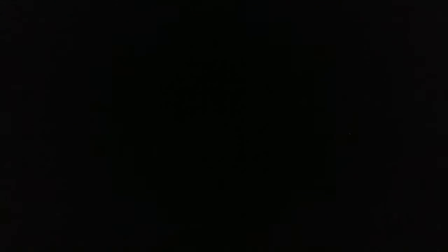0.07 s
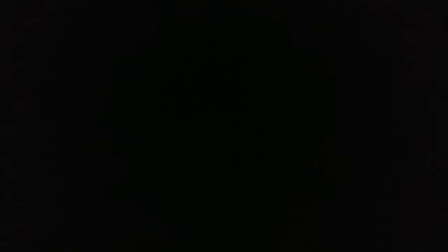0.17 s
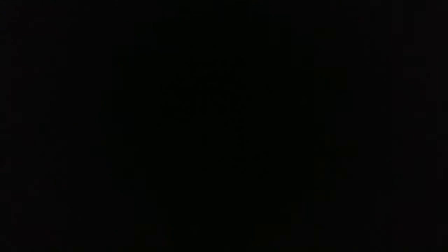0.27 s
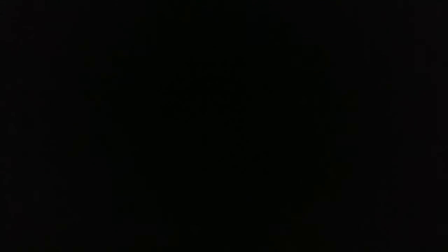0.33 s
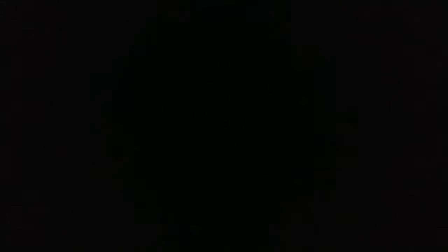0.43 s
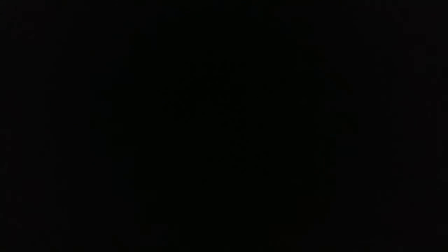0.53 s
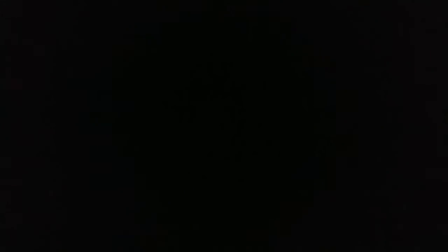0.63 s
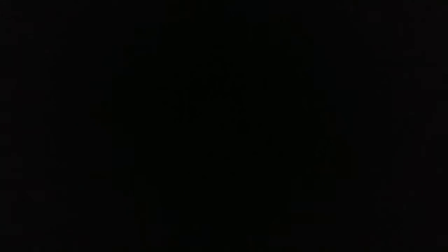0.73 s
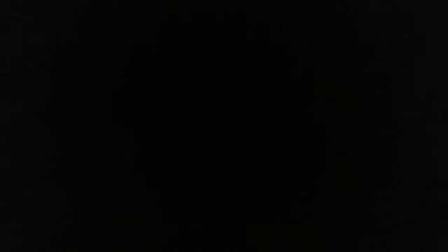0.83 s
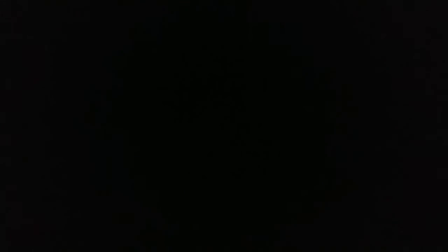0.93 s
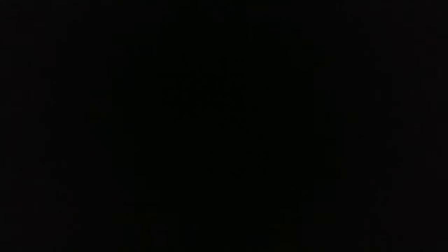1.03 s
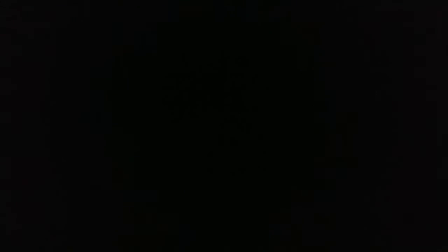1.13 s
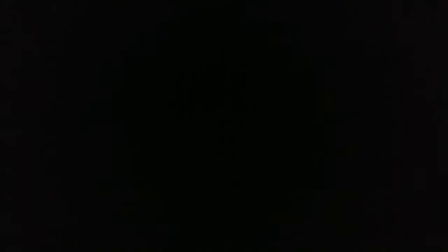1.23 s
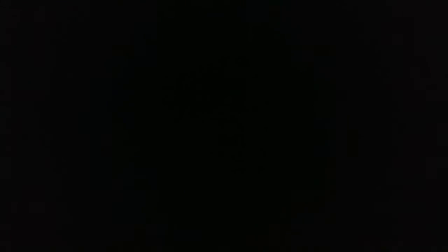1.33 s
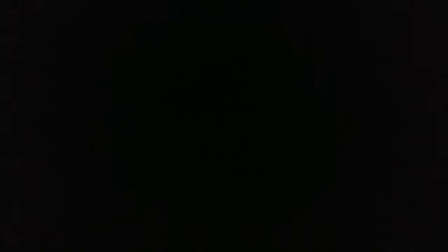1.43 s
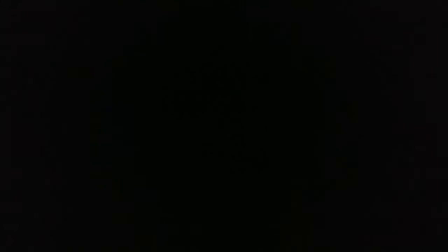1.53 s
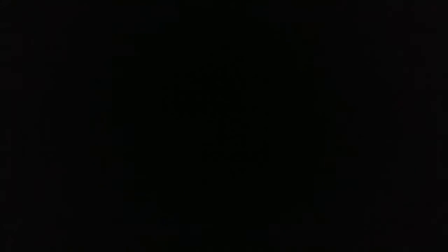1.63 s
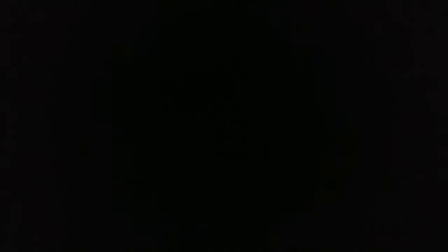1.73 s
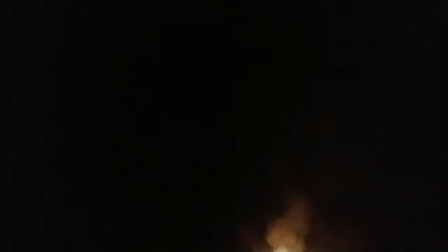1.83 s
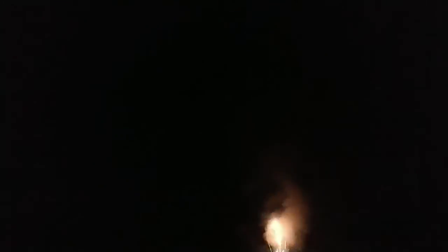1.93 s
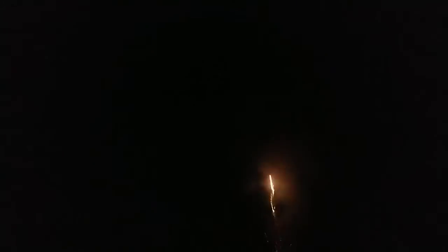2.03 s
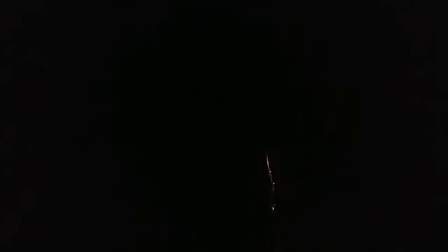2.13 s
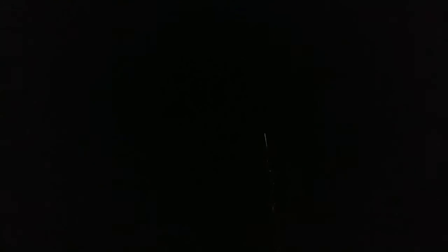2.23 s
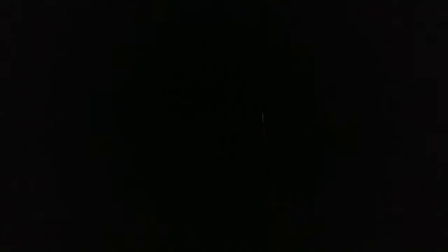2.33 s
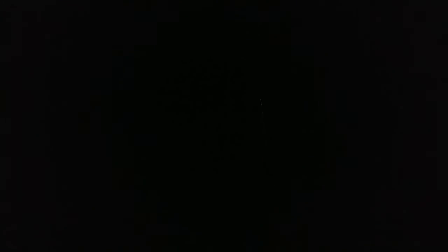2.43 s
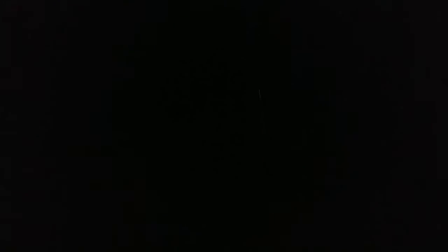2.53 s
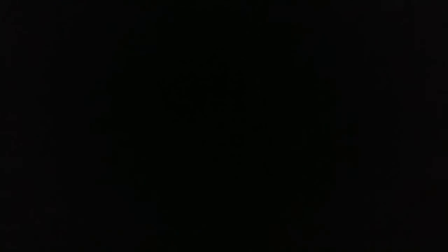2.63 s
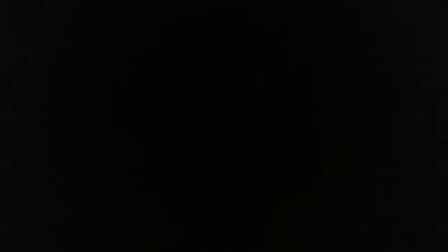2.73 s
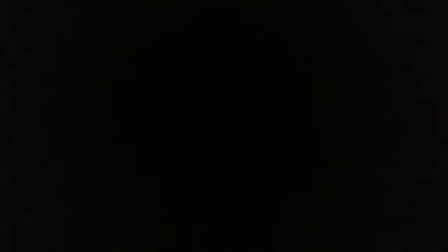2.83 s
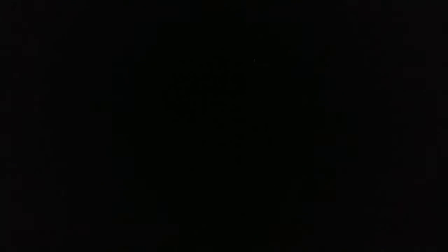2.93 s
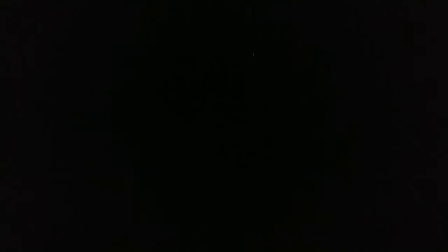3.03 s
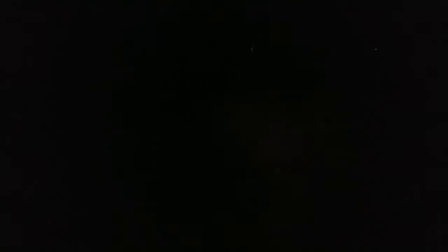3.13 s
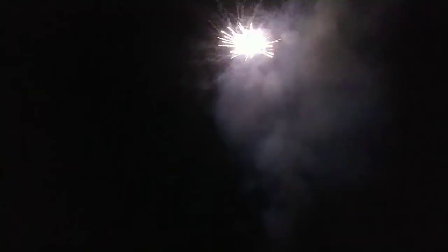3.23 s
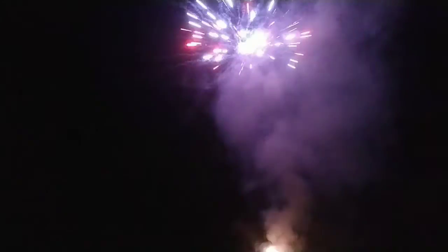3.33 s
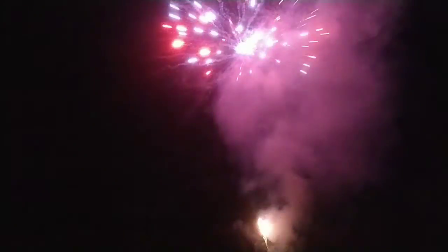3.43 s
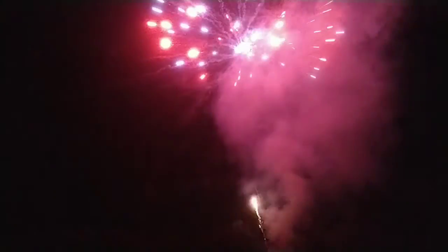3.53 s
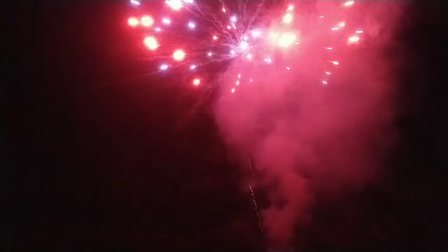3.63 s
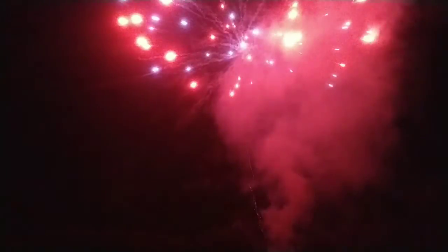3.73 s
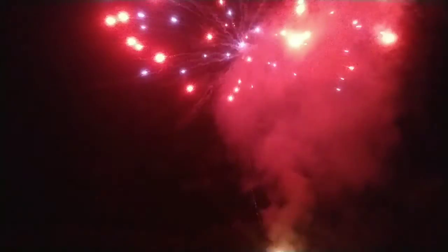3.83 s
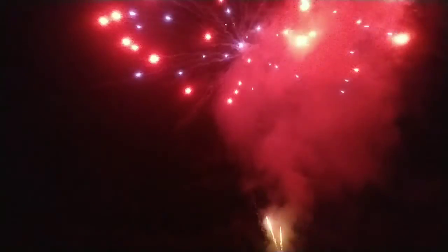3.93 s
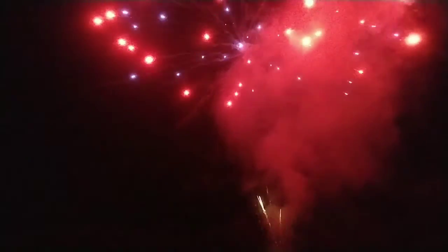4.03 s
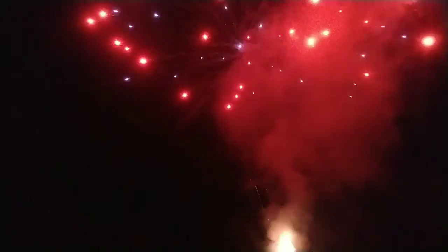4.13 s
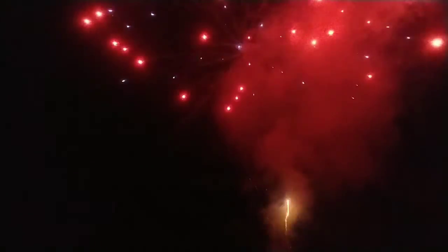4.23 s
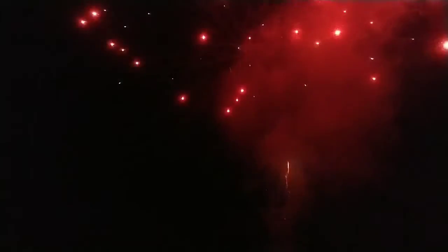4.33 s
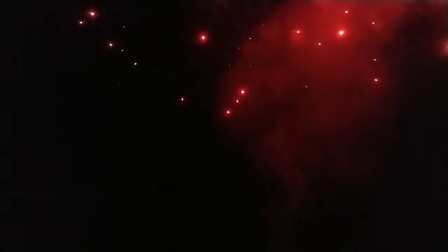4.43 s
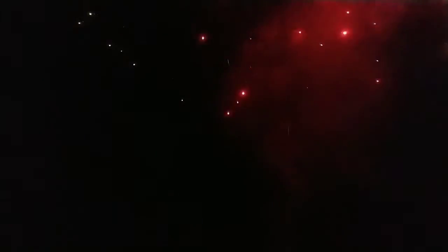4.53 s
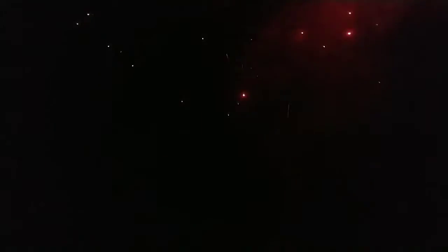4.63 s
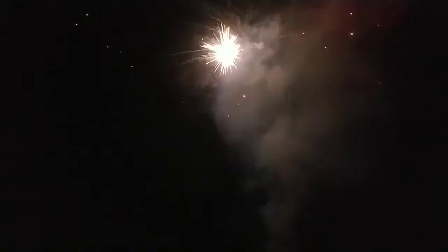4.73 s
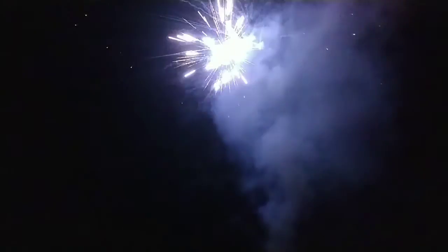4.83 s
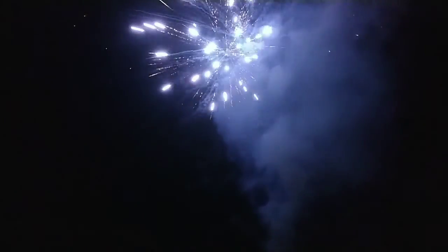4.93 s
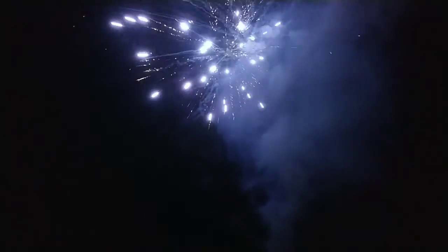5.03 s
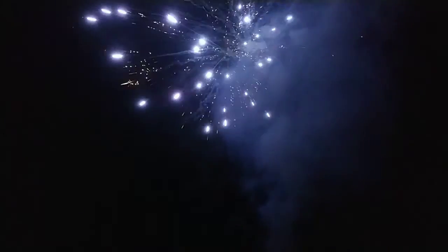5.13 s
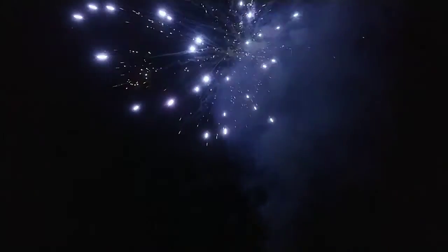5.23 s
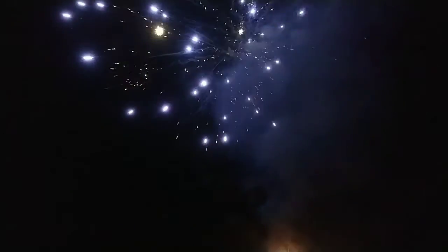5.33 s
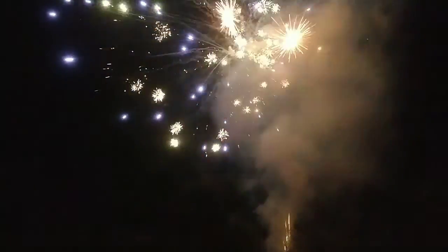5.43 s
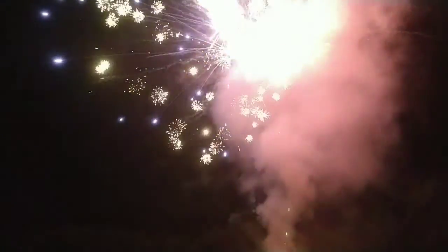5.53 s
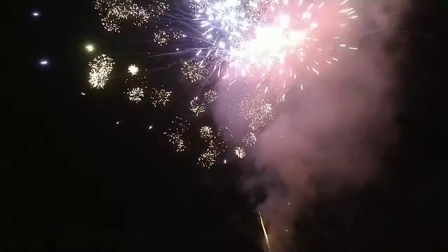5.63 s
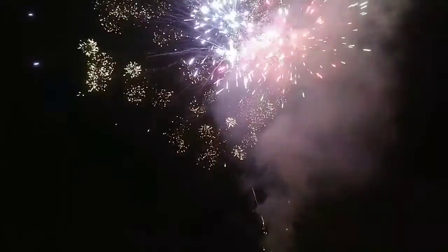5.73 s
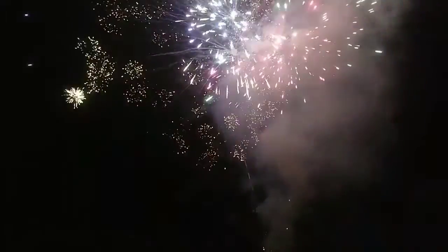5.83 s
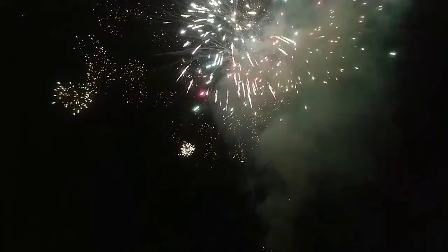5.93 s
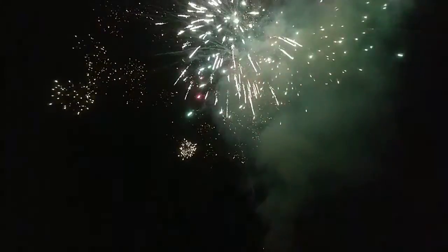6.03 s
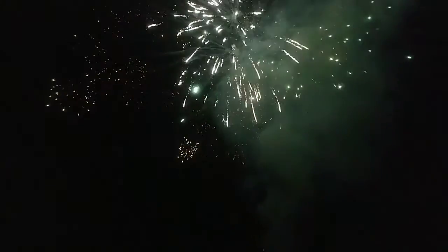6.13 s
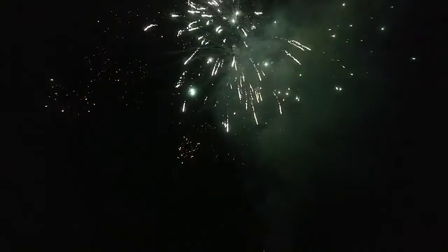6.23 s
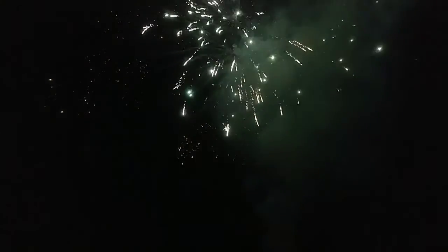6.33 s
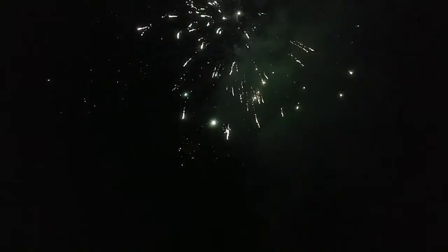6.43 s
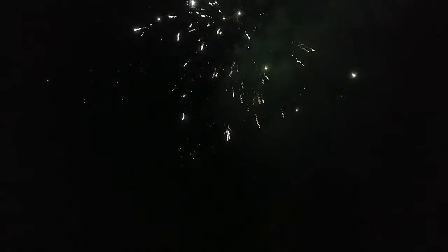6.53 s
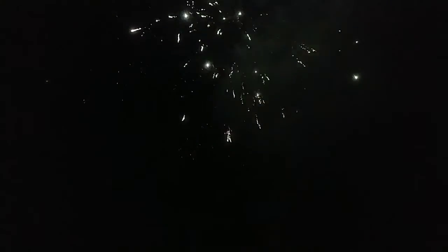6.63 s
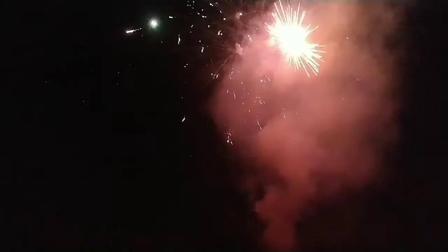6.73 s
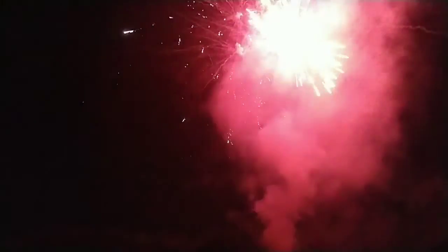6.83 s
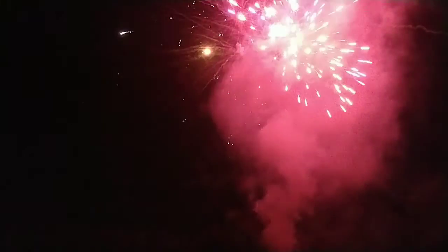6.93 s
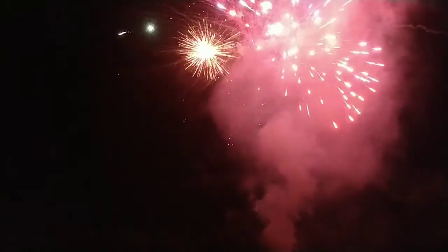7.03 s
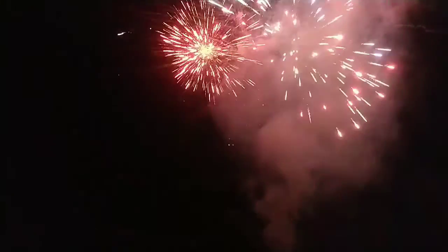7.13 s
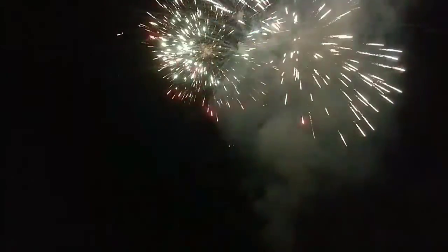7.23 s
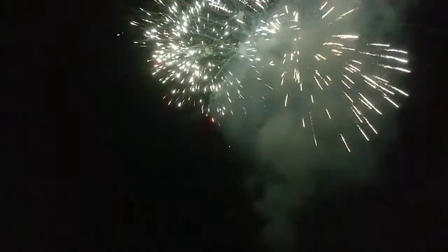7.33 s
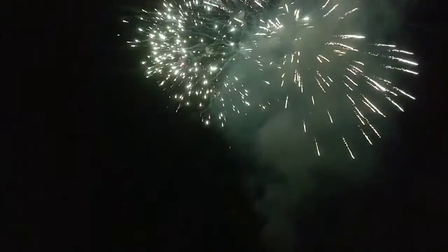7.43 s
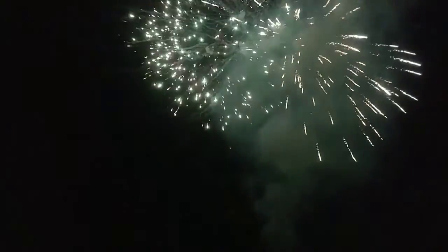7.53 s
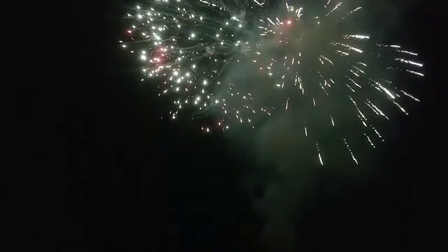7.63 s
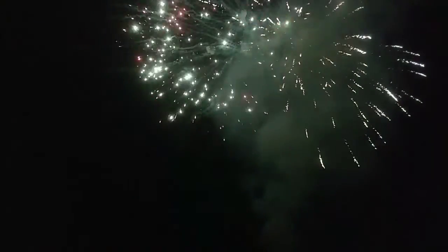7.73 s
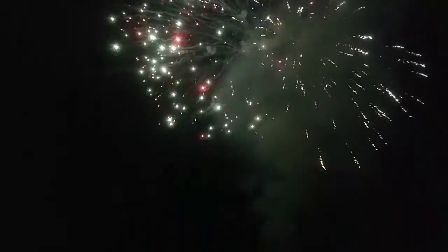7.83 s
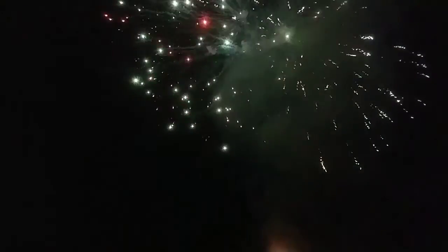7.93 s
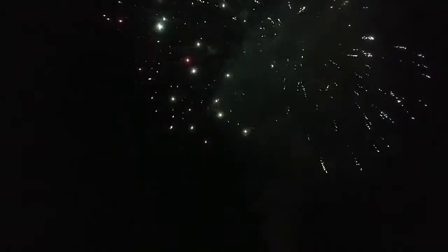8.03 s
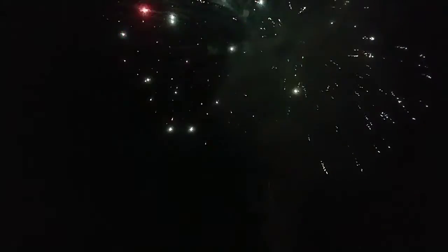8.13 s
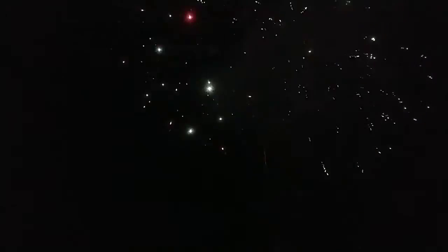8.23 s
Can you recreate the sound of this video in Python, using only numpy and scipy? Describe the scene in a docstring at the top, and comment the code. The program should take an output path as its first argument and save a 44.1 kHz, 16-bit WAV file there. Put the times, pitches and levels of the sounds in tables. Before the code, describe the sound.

A night-time fireworks show over open ground, heard close by. Low distant rumble and two faint far thuds come first, then a spitting launch thump with long echoes. After a small lone pop, shells burst overhead with hard cracks and booms, interleaved with more launch thuds. A swarm of stars crackles around six seconds, then two more bursts and a late launch. A small stereo microphone slightly flattens the loudest peaks.

```python
"""Fireworks at night over open ground. First a quiet distant rumble with a faint whine and two far thuds. From
2 s lift charges spit gas and thump out of the mortar tubes, and walls and trees roll each report back. A lone
star pops, then from 3.5 s shells crack overhead and again off the ground, as decaying shocks and booms. Near 6
s a swarm of stars crackles in short shocks. A small two-port microphone hears it all, and the loudest peaks are
rounded off."""
import sys
import numpy as np
from scipy import signal
from scipy.fft import rfft, irfft, next_fast_len
from scipy.io import wavfile
from scipy.ndimage import uniform_filter1d

SR = 44100
rng = np.random.default_rng(int(sys.argv[2]) if len(sys.argv) > 2 else 0)


def wav_out(sig):
    """Save sig, one row per channel (or a flat mono array), as 16-bit PCM at SR to the path in sys.argv[1]."""
    wavfile.write(sys.argv[1], SR, np.round(np.clip(np.atleast_2d(sig).T, -1, 1) * 32767).astype(np.int16))


N = 365148
HZ = np.fft.rfftfreq(N, 1 / SR)
TIME = np.arange(N) / SR

# lift charges leaving the tubes: (time [s], thump level [dB], gas over thump [dB], thump pitch [Hz],
# roll level [dB], roll tilt [dB per band upwards])
LIFT_CHARGES = [(2.048, -7.5, -8.5, 173, 1, 0), (3.5219, -14.5, -11, 175, -5.5, 0.5),
                (4.043, -10.5, -9.5, 194, 1.5, -0.5), (4.2837, -8, -8, 182, 1, 0),
                (5.5142, -7.5, -10.5, 167.4, 1.5, -0.5), (5.7549, -15, -11.5, 179, -7.5, 1),
                (8.1197, -7, -6.5, 171, 1, 0)]
# shells bursting overhead: (time [s], boom level [dB], crack over boom [dB], ground bounce delay [s],
# roll level [dB], roll tilt [dB per band upwards])
SHELL_BURSTS = [(3.4839, -5.5, -20, 0.006, 1.5, -0.5), (5.002, -5.5, -20, 0.0056, 0, 0),
                (5.7057, -6, -19, .0055, 2.5, -2.2), (5.7261, -11.5, -23, 0.0051, -1.5, 1.33),
                (6.9711, -6, -21, 0.00535, -1, 0.5), (7.2959, -7, -21, 0.0056, -1.5, 0)]
# far walls returning a lift: (delay [s], level [dB])
LIFT_WALLS = [(.115, -8), (.19, -7.5), (0.31, -8), (0.398, -10.5), (0.471, -8.5), (.514, -6.5),
              (.615, -16.5), (.645, -15.5), (0.729, -22.5), (.838, -17), (.868, -46), (1.033, -29),
              (1.063, -27.5), (1.176, -31.5)]


def undb(db):
    """Decibels to an amplitude factor."""
    return 10 ** (np.asarray(db) / 20)


def unit(x):
    """Scale to an RMS of one."""
    return x / np.sqrt(np.mean(x ** 2))


def along(table, order=1, hz=HZ):
    """A column of a (Hz, ..) table at every frequency, interpolated over log frequency."""
    table = np.array(table)
    return np.interp(np.log(hz + 1), np.log(table[:, 0]), table[:, order])


def band(x, lo_hz, hi_hz):
    """Keep the sound between two frequencies."""
    sos = signal.butter(2, [lo_hz, hi_hz], "bandpass", fs=SR, output="sos")
    return signal.sosfilt(sos, x)


def walk(rate):
    """Random levels held 1 / rate s and slewed twice."""
    hold = int(SR / rate)
    steps = np.repeat(rng.standard_normal(N // hold + 1), hold)
    return uniform_filter1d(uniform_filter1d(steps, hold), hold)[:N]


def add(track, s, sound):
    """Lay a sound into the track from time s, cut at the end of the track."""
    i = int(s * SR)
    track[i:i + len(sound)] += sound[:max(N - i, 0)]


def thump(hz, cycles, rise_s=0.0001):
    """A pressure step rings the bass resonance of the microphone, swinging negative first."""
    t = TIME[:3000]
    ring = np.sin(2 * np.pi * hz * t) * np.exp(-t * hz / cycles)
    return -1.5 * ring * (1 - np.exp(-(t / rise_s) ** 2))


def night():
    """Distant rumble that drifts, sinks and swells again, a faint steady whine, two far thuds."""
    # slow course of the rumble: (time [s], level [dB])
    fade = [(0, -49.5), (.5, -52), (1.4, -54), (2, -54), (3.2, -57), (8.28, -51.5)]
    # spectrum of the rumble: (frequency [Hz], density [dB per Hz])
    colour = [(30, -19.5), (60, -9), (130, 2), (260, 2.5), (500, -4), (1000, -15), (1600, -26),
              (2200, -31.5), (2800, -34), (4500, -40), (6500, -35), (10000, -42.5), (16000, -46.5)]
    # faint far-off thuds: (time [s], level [dB], pitch [Hz])
    thuds = [(0.885, -39, 300), (1.318, -32.5, 310)]
    whine_hz, whine_width_hz, whine_db = 2730, 160, -82.5
    drift = undb(np.interp(TIME, *np.transpose(fade)) + 0.76 * walk(1.9) + 1.4 * walk(12))
    sides = []
    for _ in range(2):
        rumble = irfft(rfft(rng.standard_normal(N)) * undb(along(colour)), N)
        sides.append(drift * unit(rumble))
    narrow = np.exp(-((HZ - whine_hz) / whine_width_hz) ** 2)
    whine = irfft(rfft(rng.standard_normal(N)) * narrow, N)
    sides[0] += undb(whine_db) * unit(whine)
    for s, db, hz in thuds:
        add(sides[0], s, undb(db) * thump(hz, cycles=1.2, rise_s=.002))
    return sides


def ports(left, other, lag_s):
    """The right port hears less bass, ahead in phase, and the whole wave a little later."""
    # right port against left: (frequency [Hz], quieter by [dB], phase lead [rad],
    # likeness in diffuse sound [0-1])
    between_ports = [(30, 16, 1.75, 1), (169, 7.5, 2.06, 1), (530, 4, 2.36, 0.48), (860, 2.5, 2.46, 0.83),
                     (1440, 2.5, 2.6, 0.75), (2070, 1.5, 2.35, 0.65), (2500, 2.5, 2.38, 0.55),
                     (4100, 3, 1.6, 0.3), (5500, 5.5, .5, 0.2), (8200, 7.5, .1, 0.7),
                     (11300, -1.5, 0.26, 0.7), (16000, 0.5, .1, .8)]
    size = next_fast_len(N + SR)
    hz = np.fft.rfftfreq(size, 1 / SR)
    quieter_db, lead, like = (along(between_ports, order=k, hz=hz) for k in (1, 2, 3))
    like = np.clip(like, 0, 1)
    heard = rfft(left, size)
    if other is not None:  # diffuse sound is only partly alike at the two ports
        heard = like * heard + np.sqrt(1 - like ** 2) * rfft(other, size)
    turn = np.exp(1j * (lead - 2 * np.pi * hz * lag_s))
    right = irfft(heard * turn * undb(-quieter_db), size)[:N]
    return np.array([left, right])


def lifts():
    """Gas spits from the tube, the charge thumps, and near and far surfaces repeat it."""
    # near returns, the direct sound first: (delay [s], thump level [dB], gas level [dB], pitch factor)
    near = [(0, 8, 19.5, 1), (.009, -9.5, 7.5, 1.4), (0.0169, -7.5, 4.5, 1.4), (0.0277, 6, 5, 1.45),
            (.037, -8, 7.5, 1.4)]
    # a hard surface slaps back the middle of each lift: (delay [s], level [dB])
    slaps = [(.038, -7), (.076, -14)]
    slap_hz, slap_width_hz, slap_s = 1596, 880, .003
    lead_hiss_db, lead_hiss_s = -23, 0.0092  # a faint hiss just ahead of the spit
    bright_hz, bright_width_hz, bright_db = 6160, 1500, 6.5  # the brightest part of the gas
    out, t = np.zeros(N), TIME[:900]
    spit = (t / 0.0065) ** 2.63 * np.exp(-(t / 0.0048) ** 2.05)
    lead_hiss = np.minimum(t / .002, 1) * np.exp(-(t / lead_hiss_s) ** 4)
    slap = np.exp(-((t - 2 * slap_s) / slap_s) ** 2)

    def noise(lo_hz, hi_hz):
        """Random noise in one band."""
        return band(rng.standard_normal(len(t)), lo_hz, hi_hz)

    def noise_around(hz, width_hz):
        """Random noise centred on one frequency."""
        return noise(hz - width_hz / 2, hz + width_hz / 2)

    for s, db, gas_db, hz, *_ in LIFT_CHARGES:
        add(out, s - lead_hiss_s, undb(db + lead_hiss_db) * lead_hiss * noise(400, 8000))
        for delay, thump_db, spit_db, pitch in near:
            gas = noise(1100, 7800) + undb(bright_db) * noise_around(bright_hz, bright_width_hz)
            add(out, s + delay - .003, undb(db + gas_db + spit_db) * gas * spit)
            body = thump(hz * pitch, cycles=0.98, rise_s=.0004)
            add(out, s + delay + .0032, undb(db + thump_db) * body)
        for delay, slap_db in slaps:
            middle = unit(noise_around(slap_hz, slap_width_hz))
            add(out, s + delay - 2 * slap_s, undb(db + slap_db) * slap * middle)
        for delay, far_db in LIFT_WALLS:
            dull = thump(hz * 0.806, cycles=1.16, rise_s=0.0059)
            add(out, s + delay, undb(db + far_db) * dull)
    return out


def roll(density=900, scatter_db=0.5, clump_db=1.5):
    """Many scattered returns of uneven size come in clumps over a wash, shaped band by band."""
    # spectrum of the roll: (frequency [Hz], density [dB per Hz])
    colour = [(30, -29.5), (60, -12), (110, 1.5), (170, 3), (280, -4.5), (450, -10), (800, -12),
              (1300, -15.5), (1700, -18.5), (2400, -25.5), (3300, -26.5), (4700, -32.5), (6500, -27.5),
              (9500, -38), (11000, -40), (13500, -52.5), (16000, -67)]
    shared = walk(90)
    clumps = [clump_db * (share * shared + 0.46 * walk(60)) for share in (.2, 0.3, 0.61, 0.61, 0.51)]
    # five bands, bass to top, split at these edges in Hz
    below = [1 / (1 + (HZ / edge) ** 6) for edge in (210, 450, 2100, 9300)]
    shares = (below[0], below[1] - below[0], below[2] - below[1], below[3] - below[2], 1 - below[3])
    levels, sides = roll_levels(), []
    for _ in range(2):
        arrivals = rng.random(N) < density / SR  # density is returns per second
        sizes = undb(scatter_db * rng.exponential(size=N))
        returns = arrivals * sizes * rng.standard_normal(N)
        wash = rfft(.5 * unit(returns) + rng.standard_normal(N)) * undb(along(colour))
        parts = [unit(irfft(wash * share, N)) for share in shares]
        sides.append(sum(p * level * undb(c) for p, level, c in zip(parts, levels, clumps)))
    return sides


def roll_levels():
    """Amplitude of the five bands: all rolls add up, each dipping under the reports that follow it."""
    # roll after a report, one row per band (bass, low middle, middle, treble, top):
    # (near returns [dB], they last [s], their fall [dB/s], far swell [dB], swell arrives [s],
    # swell holds until [s], its fall [dB/s], smear of wall echoes [dB])
    lift_bands = [(-19.5, .04, 501, -28, 0.065, 0.35, 45.5, -17.5),
                  (-19, 0.053, 349, -25, 0.051, 0.19, 77, -43.5),
                  (-29.5, 0.039, 401, -30, 0.094, 0.23, 53, -36),
                  (-24.5, 0.036, 402, -29.5, 0.068, 0.19, 68.5, -44.5),
                  (-38.5, 0.04, 396, -45, 0.039, 0.12, 93, -69)]
    burst_bands = [(-20.5, 0.028, 400, -28.5, .1, 0.54, 23.6, -19.5),
                   (-15.5, 0.033, 680, -22.5, 0.033, 0.13, 24.6, -21),
                   (-23, 0.034, 420, -29.5, 0.11, 0.2, 19, -25.5),
                   (-32, 0.014, 300, -32, 0.12, 0.15, 29.7, -31),
                   (-47, .02, 300, -48.5, 0.065, 0.15, 47, -60)]  # same columns
    # far walls returning a burst: (delay [s], level [dB])
    burst_walls = [(.16, -5.5), (.58, -28), (.67, -11), (.98, -7.5), (1.039, -15)]
    duck_db, duck_s = -5.5, 0.24  # older rolls dip under each new report and come back
    roll_lag_s = 0.0048
    t = TIME[::44]  # a coarse grid is enough for slow levels
    reports = [(row[0], lift_bands, LIFT_WALLS, *row[-2:]) for row in LIFT_CHARGES]
    reports += [(row[0], burst_bands, burst_walls, *row[-2:]) for row in SHELL_BURSTS]
    power = 0
    for s, *shape in reports:
        dip_db = sum(duck_db * np.exp(-np.maximum(t - later, 0) / duck_s) * (t > later)
                     for later, *_ in reports if later > s)
        after = t - s - roll_lag_s
        power = power + roll_power(*shape, np.maximum(after, -1)) * undb(2 * dip_db)
    return [np.interp(TIME, t, np.sqrt(p)) for p in power]


def roll_power(bands, walls, level_db, tilt_db, t):
    """Power per band after one report: near returns, a swell from afar that dies away, smeared wall echoes."""
    gather_db, gather_s = -1.5, 0.031  # the first returns gather just behind the report
    smear_s, peak_s = .012, .007
    air_db_per_s = 5  # wall echoes lose this much more in each higher band
    rows = []
    # decibels are doubled because undb gives amplitude and these are powers
    for k, (near_db, near_s, near_fall, far_db, arrive_s, hold_s, far_fall, smear_db) in enumerate(bands):
        near_fade_db = near_fall * np.maximum(t - near_s, 0)
        near = undb(2 * (near_db - near_fade_db + gather_db * np.exp(-t / gather_s)))
        arrival = (1 - np.exp(-(t / arrive_s) ** 2)) ** 2
        swell = arrival * undb(2 * (far_db - far_fall * np.maximum(t - hold_s, 0)))
        echoes = 0
        for delay, db in walls:
            smear = np.exp(-((t - delay - peak_s) / smear_s) ** 2)
            echoes = echoes + undb(2 * (db - k * air_db_per_s * delay)) * smear
        total = near + swell + undb(2 * smear_db) * echoes
        rows.append(total * undb(2 * (level_db + k * tilt_db)))
    return np.array(rows) * (t >= 0)


def shock(hz, cycles):
    """A sudden jump up, a swing below, and quickly over."""
    t = TIME[:400]
    return np.cos(2 * np.pi * hz * t) * np.exp(-t * hz / cycles)


def stars():
    """Short shocks with a faint ground bounce: single ones, and a swarm of small ones."""
    # single crackling stars: (time [s], level [dB])
    singles = [(2.772, -32.5), (5.947, -13), (6.0012, -14), (6.007, -4), (6.0363, -8), (6.041, -5),
               (6.0482, -11), (6.2073, 0.5)]
    # swarm of small stars: (time [s], level [dB])
    swarm = [(5.55, -42), (5.85, -23.5), (6.05, -14.5), (6.3, -22), (6.6, -65)]
    swarm_per_s, swarm_scatter_db = 290, 2.5
    out = np.zeros(N)
    pop = band(shock(2200, cycles=0.13), 600, 8600)
    for s, db in singles:
        add(out, s, undb(db) * pop)
    s, db = np.transpose(swarm)
    swarm_level = undb(np.interp(TIME, s, db, left=-200, right=-200))
    sizes = (rng.random(N) < swarm_per_s / SR) * undb(swarm_scatter_db * rng.standard_normal(N))
    dull = band(shock(740, cycles=0.37), 300, 7200)
    out += signal.fftconvolve(sizes * swarm_level, dull)[:N]
    lag = int(.005 * SR)  # the ground bounce comes 5 ms behind
    return out + undb(-12.5) * np.concatenate([np.zeros(lag), out[:-lag]])


def bursts():
    """A shock and its boom: direct, off things close by, off a near wall, and rounded off the ground."""
    # arrivals besides the ground: (delay [s], shock level [dB], boom level [dB], crack level [dB],
    # roundness [0-1])
    paths = [(0.0, 8.5, 5, 20, 0.65), (.0020, 2, -38, 10, 1), (.0032, 4.5, -7, 3, .75),
             (0.0231, 0, -9, -8, 0.9), (0.0297, 7, -9, -8, 0.9)]
    # the ground bounce: (shock level [dB], boom level [dB], crack level [dB], roundness [0-1])
    ground = (12, 1.2, 3, 0.79)
    boom_hz, boom_cycles, low_hz = 220, .85, 100
    out, t = np.zeros(N), TIME[:3000]
    front = shock(645, cycles=0.39)
    for s, db, crack_db, bounce, *_ in SHELL_BURSTS:
        for delay, shock_db, boom_db, edge_db, soft in paths + [(bounce, *ground)]:
            # the front is ragged in the treble; each path rounds it by its own amount
            crack = rng.standard_normal(len(t)) * np.exp(-t / 0.0013)
            keep = min(soft, .95)
            rounded = signal.lfilter([(1 - keep) ** 2], [1, -2 * keep, keep ** 2], front)
            add(out, s + delay, undb(db + shock_db) * rounded)
            add(out, s + delay, undb(db + crack_db + edge_db) * band(crack, 3400, 8500))
            add(out, s + delay + 0.0002, undb(db + boom_db) * thump(boom_hz, boom_cycles))
    return band(out, low_hz, 21000)


def scene():
    """Night and roll surround the microphone; tubes and sky each reach its right port a little later."""
    (echo, echo_other), (far, far_other) = roll(), night()
    overhead = ports(bursts() + stars(), None, lag_s=0.000356)
    around = ports(echo + far, echo_other + far_other, lag_s=0.000379)
    tubes = ports(lifts(), None, lag_s=0.000376)
    return around + tubes + overhead


def record(dry):
    """The microphone loses the deepest bass; the loudest peaks are rounded off; the top is cut."""
    top_hz = 16200
    thin = signal.sosfilt(signal.butter(3, 52, "highpass", fs=SR, output="sos"), dry)
    top = signal.ellip(10, .2, 80, top_hz, fs=SR, output="sos")
    return signal.sosfilt(top, np.tanh(0.83 * thin) / 0.87)


dry = scene()
out = record(dry)
wav_out(out)
```